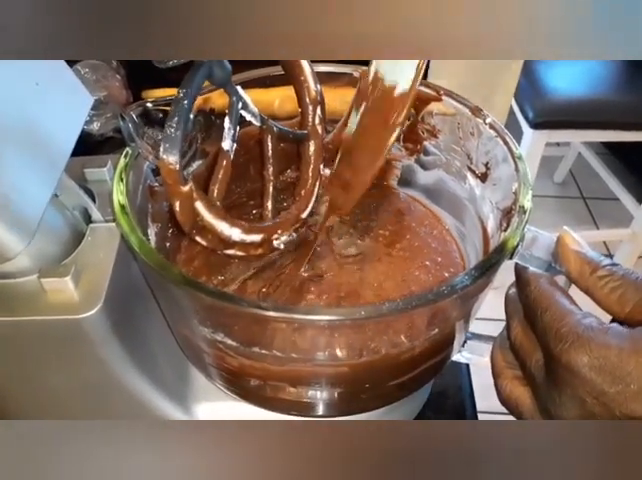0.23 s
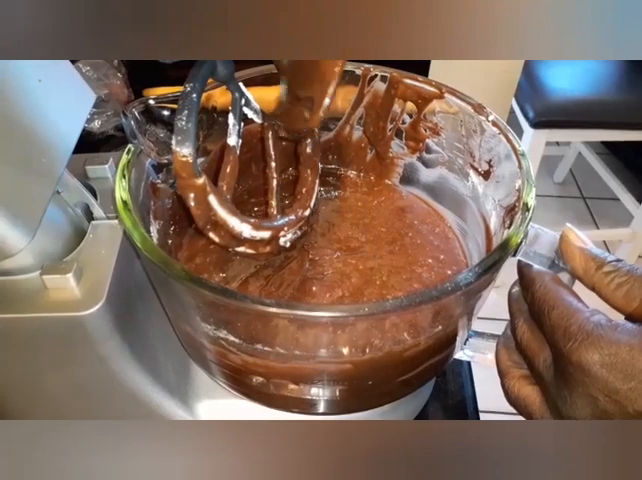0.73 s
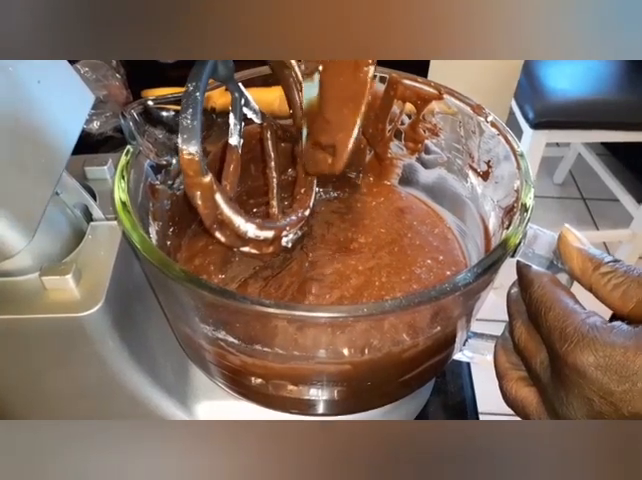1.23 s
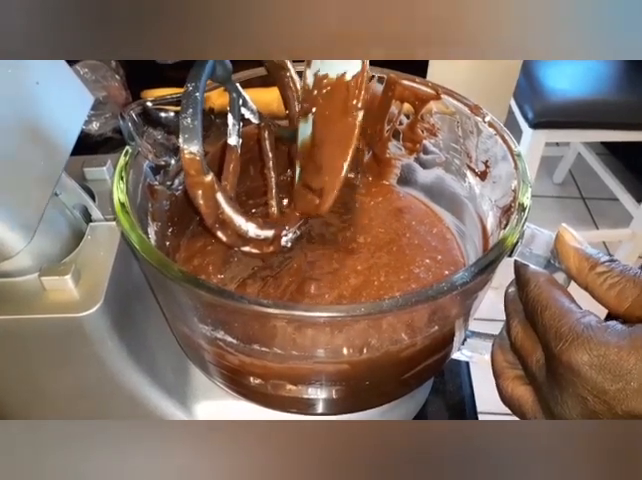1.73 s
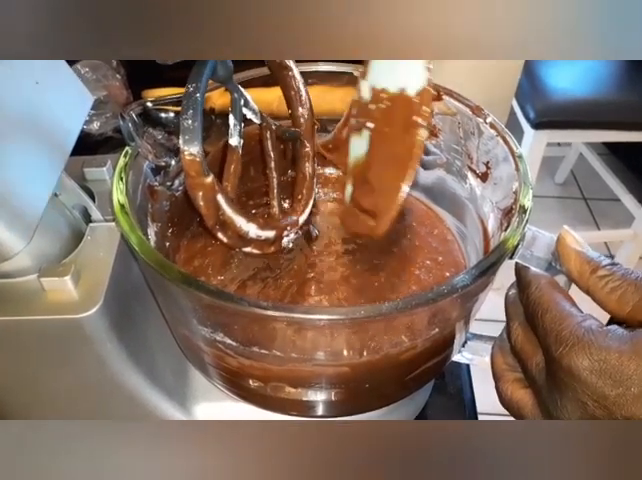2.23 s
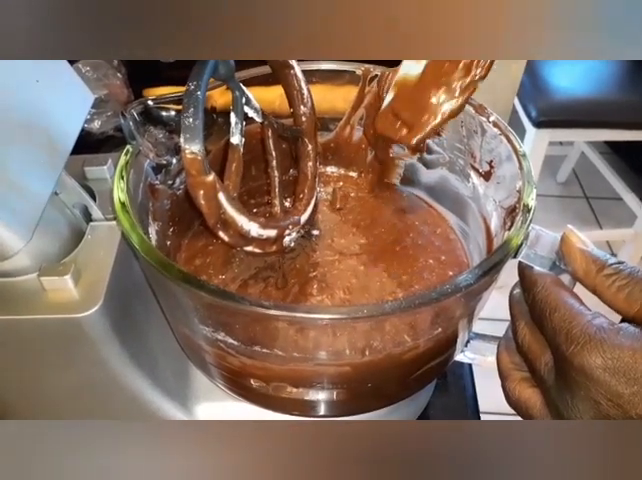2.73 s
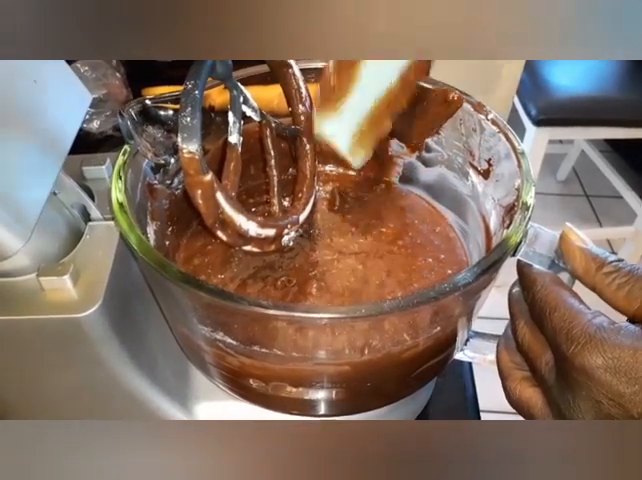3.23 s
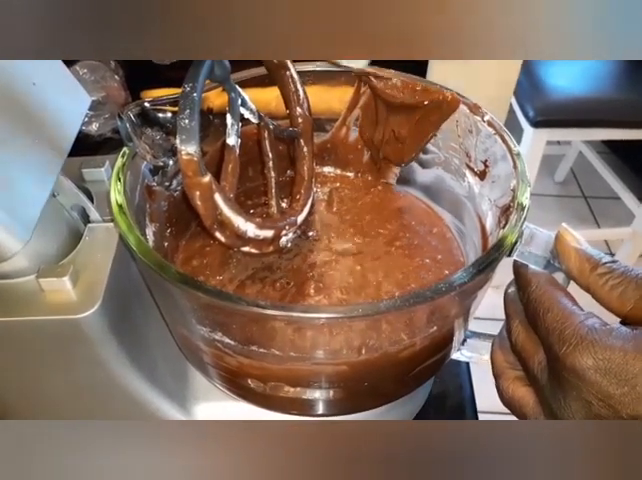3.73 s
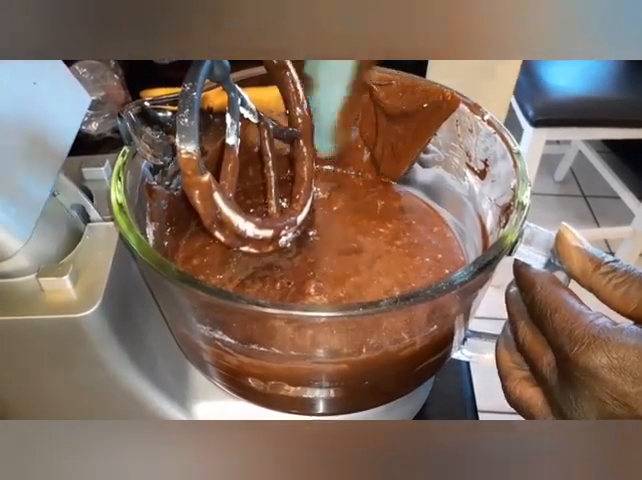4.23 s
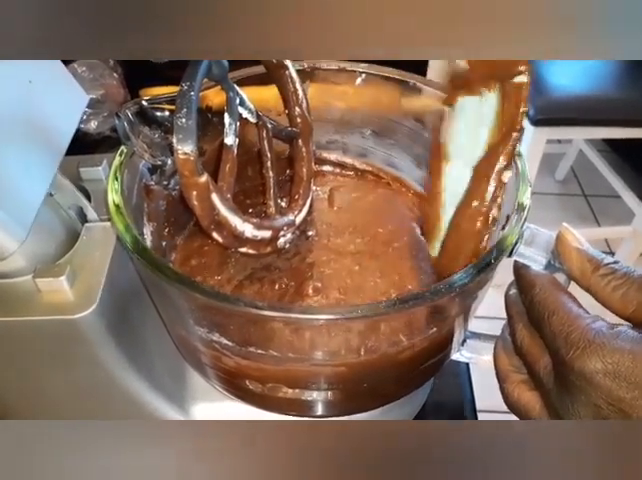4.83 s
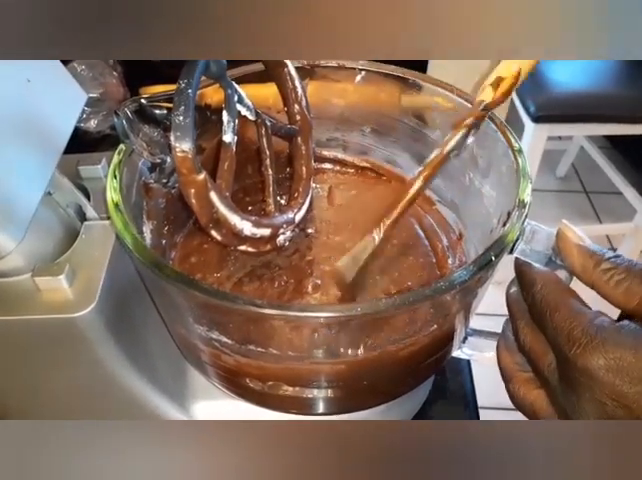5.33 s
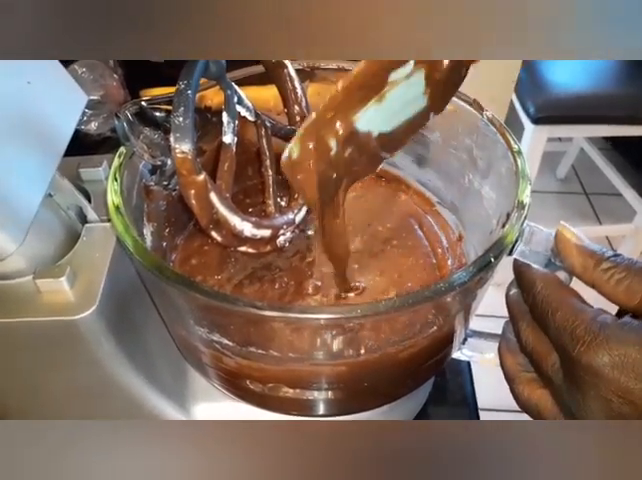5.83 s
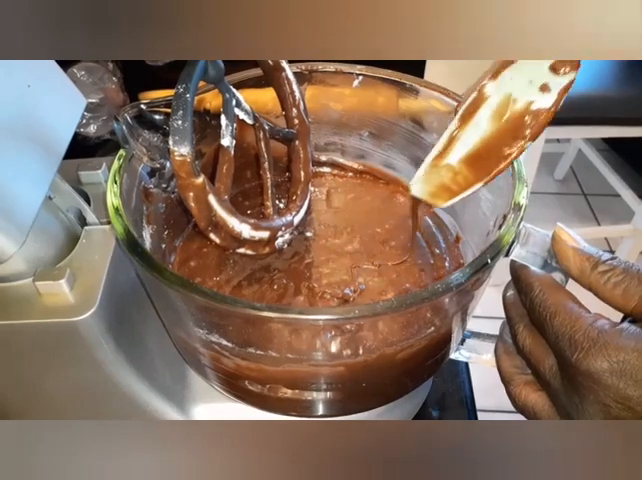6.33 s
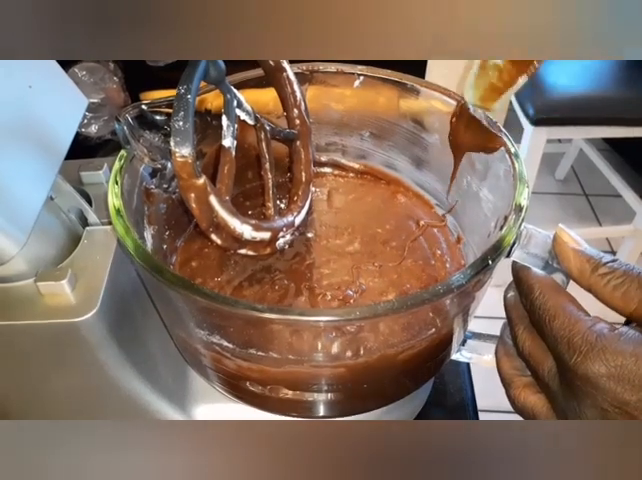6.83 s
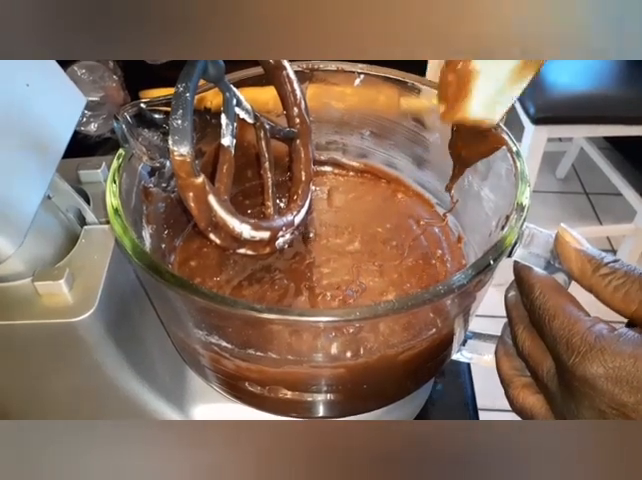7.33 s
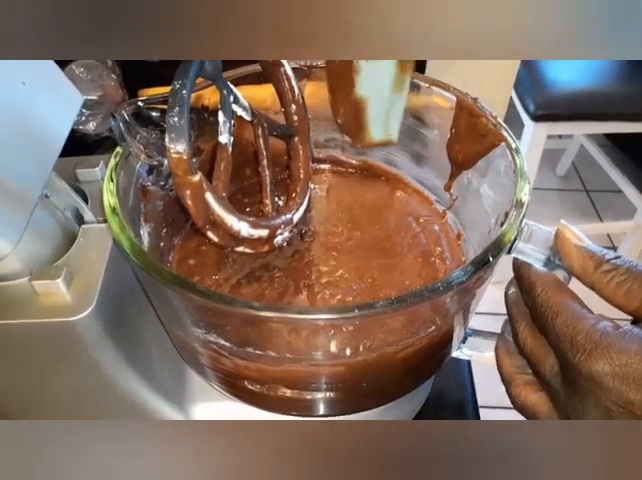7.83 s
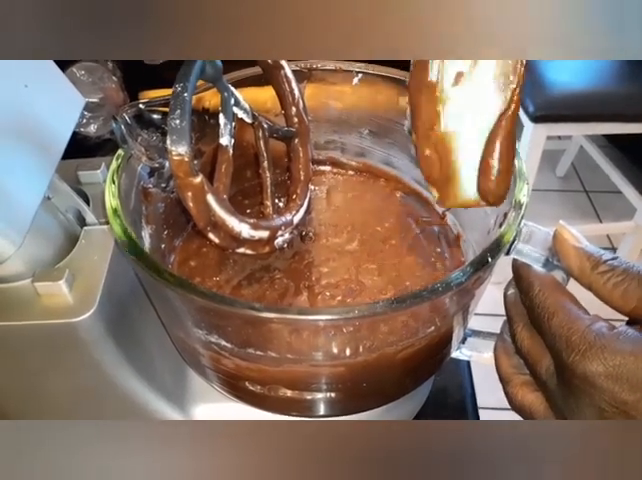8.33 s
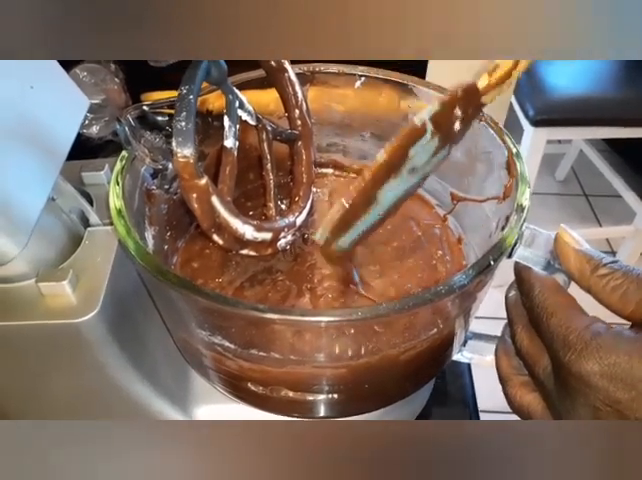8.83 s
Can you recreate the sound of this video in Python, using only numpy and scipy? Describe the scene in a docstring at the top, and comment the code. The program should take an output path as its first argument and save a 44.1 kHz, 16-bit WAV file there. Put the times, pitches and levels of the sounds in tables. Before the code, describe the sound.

Faint motor hum and airy room rumble sit under quiet, sticky batter work. The spatula bumps a coated beater, one bump clearly louder, then glides hissing around the glass wall. Three quick bright knocks ring the bowl and the small room, the background dipping afterwards and recovering. Light wet wiping returns before two duller knocks near the end. Close stereo microphones, leaning left.

```python
"""In a small kitchen, before two microphones: a spatula works thick batter off a beater and round a glass bowl.
Soft bumps ring the beater's modes; smears, a faint squeak and long passes are sticky, crackling noise bands.
Threads of batter snap. Two bouts of raps ring the glass and the room, each rap followed by a clack of the stand.
A motor hums throughout over rumble and air; the recorder's gain ducks after the raps and then comes back."""
import sys
import numpy as np
from scipy import signal
from scipy.fft import rfft, irfft, next_fast_len
from scipy.io import wavfile
from scipy.ndimage import uniform_filter1d, minimum_filter1d

SR = 44100
rng = np.random.default_rng(int(sys.argv[2]) if len(sys.argv) > 2 else 0)


def waveform_to_disk(signal):
    """Save audio, clipped to [-1, 1], as 16-bit WAV at the path in sys.argv[1]."""
    frames = np.transpose(np.atleast_2d(signal))
    scaled = np.clip(frames, -1, 1) * 32767
    samples = np.round(scaled).astype(np.int16)
    wavfile.write(sys.argv[1], SR, samples)


N = 400856
CUTOFF_HZ = 15900  # top of the recorder's band


def from_db(db):
    """Decibels to amplitude gain."""
    return 10 ** (np.asarray(db) / 20)


def at_hz(points, hz):
    """Read a spectrum by straight lines on a log-frequency axis."""
    f, value = np.transpose(points)
    return np.interp(np.log(np.maximum(hz, 1)), np.log(f), value)


# How much louder the left microphone hears each pitch: f/Hz, left minus right level/dB
LEFT_LEAN = [(60, 4.5), (130, 4.8), (220, 1.5), (380, 1.5), (700, 3), (1300, 4.8), (2400, 3.5), (4400, 1),
             (8000, 3.5), (14000, 9.5)]


def lean(hz):
    """Left and right gains: the left microphone hears everything louder."""
    return from_db(np.array([[.5], [-.5]]) * at_hz(LEFT_LEAN, hz))


def drift(per_s, n):
    """Random wander about 0 with a spread near 1: straight lines between normal draws."""
    steps = np.arange(n) / SR * per_s
    knots = int(steps[-1]) + 2
    return np.interp(steps, np.arange(knots), rng.standard_normal(knots))


# Likeness of the sound at the two microphones: f/Hz, correlation (1 is identical)
MIC_LIKENESS = [(60, .97), (130, .98), (290, .92), (640, .3), (1400, -.05), (3000, 0), (16000, 0)]


def noise(spectrum, n, colour=((1, 0),), grains=1, ripple_db=0):
    """Stereo noise of rms 1 before tint and lean; grains chop it, the bowl's hollow ripples its treble."""
    size = next_fast_len(n)
    hz = np.arange(size // 2 + 1) * SR / size
    mid, side = rfft(rng.standard_normal((2, n)) * grains, size)
    alike = np.clip(at_hz(MIC_LIKENESS, hz), -1, 1)
    hollow_hz = np.arange(2500, CUTOFF_HZ, 130)
    ripple = ripple_db * np.interp(hz, hollow_hz, rng.standard_normal(len(hollow_hz)), left=0)
    gain = from_db(at_hz(spectrum, hz) + ripple)
    gain = gain / np.sqrt(np.mean(gain ** 2))
    gain = gain * from_db(at_hz(colour, hz))
    common = np.sqrt((1 + alike) / 2) * mid
    opposed = np.sqrt((1 - alike) / 2) * side * np.array([[1], [-1]])
    return irfft((common + opposed) * gain * lean(hz), size)[:, :n]


def dying(t, t60):
    """Exponential decay that falls by 60 dB in t60 seconds."""
    return np.exp(-np.log(1000) * t / t60)


def add(out, s, sound):
    """Mix a sound in at time s, in seconds."""
    start = int(s * SR)
    out[:, start:start + sound.shape[1]] += sound[:, :N - start]


# Motor hum lines in the background: f/Hz, rms level/dB before the lean
MOTOR_HUM = [(120, -55.5), (150.7, -65), (240.3, -54.5), (269.2, -64), (360, -72.5), (387.6, -69.5),
             (434, -63.5), (480, -74.5), (597.5, -70.5)]
# Low rumble of fan and room: f/Hz, relative density/dB per Hz
FAN_RUMBLE = [(20, -47), (35, -43.5), (55, 3.5), (80, -6), (115, 0.5), (160, -15), (195, -10.5),
              (270, -1.5), (340, -9.5), (440, -5), (600, -10.5), (850, -20), (1400, -37)]
# Thin rush of air: f/Hz, relative density/dB per Hz
AIR_RUSH = [(500, -11), (900, -5), (1350, 2), (1800, -2.5), (2350, -1), (2900, -15), (5000, -16),
            (9000, -25), (13000, -17), (16000, -25.5)]


def motor():
    """Hum lines wavering slightly in phase and level, over a low rumble and a thin rush of air."""
    t = np.arange(N) / SR
    hum = 0
    for hz, level_db in MOTOR_HUM:
        phase = 2 * np.pi * hz * t + 0.57 * drift(7, N)
        amplitude = np.sqrt(2) * from_db(level_db + 0.91 * drift(6, N))
        hum = hum + amplitude * lean(hz) * np.sin(phase)
    rumble = from_db(-54.0) * noise(FAN_RUMBLE, N)
    air = from_db(-64.5) * noise(AIR_RUSH, N)
    return hum + rumble + air


def stickiness(n, per_s, spread_db, share, slip_db):
    """Batter parts from glass in tiny bursts over a smooth hiss, while the blade sticks and slips; rms 1."""
    happens = rng.random(n) < per_s / SR
    bursts = happens * from_db(spread_db * np.minimum(rng.exponential(1, n), 4)) ** 2
    power = np.maximum(uniform_filter1d(bursts, size=14), 0)
    share = np.clip(share, 0, 1)  # of the power that comes in bursts
    crackle = np.sqrt(1 - share + share * power / (power.mean() + 1e-12))
    grain = crackle * from_db(slip_db * drift(70.3, n))
    return grain / np.sqrt(np.mean(grain ** 2))


def wipe(length, centre_hz, octaves, swell):
    """A sticky band of noise that swells quickly and trails off."""
    hz = np.geomspace(100, 16000, 160)
    t = np.arange(int(2 * length * SR)) / SR
    # the band is 3 dB down this many octaves either side of its centre
    hump_db = -10 * np.log10(1 + np.abs(np.log2(hz / centre_hz) / octaves) ** 4)
    pressure = (1 - np.exp(-t / swell)) * np.exp(-(t / (0.9 * length)) ** 2)
    grains = stickiness(len(t), per_s=800, spread_db=2.5, share=.36, slip_db=2)
    return pressure * noise(np.c_[hz, hump_db], len(t), grains=grains, ripple_db=3.5)


SMEAR_SWELL_S, SWELL_POWER = 0.027, 0.48  # swell at a 1 kHz centre; thin bright films let go sooner
SMEAR_OCTAVES, WIDTH_POWER = .46, .22  # half-width at a 1 kHz centre; bright smears are broader
SQUEAK_S, SQUEAK_LENGTH_S, SQUEAK_HZ = 2.57, .3, 2100
SQUEAK_DB, SQUEAK_OCTAVES = -61.5, 0.12
# Short smears of the blade: t/s, length/s, level/dB, centre f/Hz
BLADE_SMEARS = [(0.06, 0.42, -70, 9000), (0.441, 0.18, -57.5, 2400), (0.669, 0.041, -49, 13000),
                (0.748, .11, -57, 11900), (.77, .13, -57.5, 1830), (1.11, 0.11, -75, 4500),
                (1.9, 0.21, -51.5, 760), (2.01, 0.61, -65.5, 11900), (2.237, 0.13, -52, 7500),
                (2.443, .1, -48, 8200), (2.549, 0.34, -67, 4500), (2.98, 0.19, -56, 880),
                (3.349, 0.09, -55, 9600), (3.37, 0.1, -41.5, 446), (3.455, .24, -60, 10000),
                (5.867, 0.11, -51, 8630), (6.12, 0.14, -58, 7000), (7.212, .11, -60, 8700),
                (7.901, 0.21, -62.5, 1850)]


def smears():
    """Short wipes of the blade, the brighter the quicker and broader, and one narrow, faint squeak."""
    out = np.zeros((2, N))
    for s, length, level_db, centre_hz in BLADE_SMEARS:
        khz = centre_hz / 1000
        octaves = SMEAR_OCTAVES * khz ** WIDTH_POWER
        swell = SMEAR_SWELL_S / khz ** SWELL_POWER
        add(out, s, from_db(level_db) * wipe(length, centre_hz, octaves, swell))
    squeak = wipe(SQUEAK_LENGTH_S, SQUEAK_HZ, SQUEAK_OCTAVES, SMEAR_SWELL_S)
    add(out, SQUEAK_S, from_db(SQUEAK_DB) * squeak)
    return out


THREADS_PER_S, THREADS_UNTIL_S = 2, 3.7  # faint ones, while the beater is being cleaned
THREAD_DB, THREAD_SPREAD_DB = -61, 2.5  # their mean level, and how far they stray either way
# Snap of a batter thread: f/Hz, relative density/dB per Hz
THREAD_SNAP = [(500, 0), (1500, -9), (4000, -10.5), (9500, -16), (13000, 2), (16000, -11)]
# The loudest snaps: t/s, level/dB
CLEAR_SNAPS = [(.094, -59), (0.674, -46), (1.238, -59), (1.407, -56), (1.511, -56), (1.694, -46),
               (1.998, -44), (2.64, -57), (3.548, -51), (4.448, -53), (4.815, -51), (7.258, -44)]


def threads():
    """Threads of batter snap, each a noise tick with a weak tail: clear ones, and faint ones at random."""
    out, t = np.zeros((2, N)), np.arange(SR // 8) / SR
    faint = []
    for when, size in rng.random((int(THREADS_PER_S * THREADS_UNTIL_S), 2)):
        faint.append((when * THREADS_UNTIL_S, THREAD_DB + THREAD_SPREAD_DB * (2 * size - 1)))
    envelope = dying(t, .022) + from_db(-14) * dying(t, .22)
    for s, level_db in CLEAR_SNAPS + faint:
        add(out, s, from_db(level_db) * noise(THREAD_SNAP, len(t)) * envelope)
    return out


def wash(spectrum, db, t60, rise):
    """A crowd of modes or echoes too dense to tell apart; t60 and rise in seconds."""
    return spectrum, db, t60, rise


# How far a ringing tone leads at the left microphone: f/Hz, phase/rad
LEFT_LEAD = [(350, 0), (560, .6), (1100, 1.3), (1300, 2.1), (1700, 1.5)]


def blows(events, modes, washes, ring_db, linger_db, linger_t60):
    """Each blow rings modes and washes; hard contact is brighter, and the room holds each tone a little longer."""
    out, t = np.zeros((2, N)), np.arange(SR * 2 // 3) / SR
    linger = from_db(linger_db) * dying(t, linger_t60)
    hz, mode_db, t60 = np.transpose(modes)
    swell = 1 - np.exp(-t * hz[:, None])  # the heavy low modes take a cycle to get going
    decay = dying(t, t60[:, None]) + linger
    tones = np.exp(2j * np.pi * hz[:, None] * t) * swell * decay
    lead = at_hz(LEFT_LEAD, hz) * np.array([[.5], [-.5]])
    for s, level_db, thud_db, hard_db in events:
        colour = [(200, thud_db), (800, 0), (1700, 0), (2700, hard_db)]
        phase = rng.uniform(-1, 1, len(hz)) + lead
        # every blow excites each mode a little differently
        gain = from_db(ring_db + mode_db + at_hz(colour, hz) + rng.standard_normal(len(hz)))
        sound = np.imag((gain * lean(hz) * np.exp(1j * phase)) @ tones)
        for spectrum, wash_db, wash_t60, rise in washes:
            crowd = noise(spectrum, len(t), colour, ripple_db=2.5)
            envelope = dying(t, wash_t60) * (1 - np.exp(-t / rise))
            sound = sound + from_db(wash_db) * crowd * envelope
        add(out, s, from_db(level_db) * sound)
    return out


CUSHIONED_THUD_DB = 8  # a bump at least this dull is too cushioned to set the beater swinging
REBOUND_S, REBOUND_LOSS_DB = .11, 6  # the beater swings back, more faintly
REBOUND_MAX_DB = -27  # its small play caps the level
# Soft bumps on the beater: t/s, level/dB, thud (bass tint)/dB, hardness (treble tint)/dB
BEATER_BUMPS = [(.693, -14.5, 2, 5.5), (1.405, -8, 7.5, 5), (1.697, -15.5, 13.5, 2.5), (2.002, 0, 4, -8),
                (2.025, -12.5, 6.5, 8.5), (2.495, -30, 19.5, 23.5), (3.392, -24, 23.5, 17.5),
                (3.45, -36, 18, 14)]
# Modes of the batter-coated beater: f/Hz, relative level/dB, t60/s
BEATER_MODES = [(121, -44.5, 0.39), (149, -36, 0.25), (255, -30, 0.076), (510, -35, 0.1), (694, -41, 0.11),
                (1006, -31.5, 0.14), (1074, -29, 0.096), (1153, -26, 0.062), (1700, -37, 0.071),
                (1856, -52, 0.3)]
# The beater's crowd of short modes: f/Hz, relative density/dB per Hz
BEATER_CROWD = [(40, -40), (120, 7), (280, -7), (750, -6), (1100, 2.5), (1400, -11), (1800, -10),
                (3000, -23.5), (8000, -32), (16000, -47)]
# The kitchen's answer to a bump: f/Hz, relative density/dB per Hz
BEATER_ECHO = [(80, -23), (700, 3), (1100, -4), (1500, -1), (3000, -12.5), (8000, -30), (16000, -46)]


def bumps():
    """Batter cushions the blade where it meets the beater, which swings back with a fainter touch."""
    rebounds = []
    for s, level_db, thud_db, _ in BEATER_BUMPS:
        if thud_db < CUSHIONED_THUD_DB:
            rebound_db = min(level_db - REBOUND_LOSS_DB, REBOUND_MAX_DB)
            rebounds.append((s + REBOUND_S, rebound_db, 0, 2))
    washes = [wash(BEATER_CROWD, db=-29.5, t60=0.11, rise=0.0012),
              wash(BEATER_ECHO, db=-50.0, t60=0.84, rise=.012)]
    return blows(BEATER_BUMPS + rebounds, BEATER_MODES, washes,
                 ring_db=.5, linger_db=-31, linger_t60=0.73)


def push(length):
    """The hand presses harder, then eases off: 0 to 1 and back."""
    t = np.arange(int(length * SR)) / SR
    peak = .4 * length
    return np.sin(np.interp(t, [0, peak, length], [0, np.pi / 2, np.pi]))


HISS_DB, RUB_DB = 2, -28.5  # gains applied to the pressure
RUB_FOLLOWS = 0.61  # the rub grows by this share of the hiss's dB
# Long glides of the blade along the wall: t/s, length/s, pressure level/dB
WALL_PASSES = [(3.394, 3.1, -69.5), (7.25, 1.8, -69.5)]
# Pushes of the hand during those passes: t/s, length/s, pressure level/dB
HAND_PUSHES = [(3.975, 0.28, -63.5), (4.184, 0.27, -60), (4.42, .14, -53), (4.564, 0.12, -51.5),
               (4.703, 0.21, -57), (4.882, .16, -59.5), (7.483, .16, -62.5), (7.626, 0.079, -67),
               (7.87, 0.14, -63), (8.04, 0.082, -62), (8.142, 0.14, -67), (8.797, 0.15, -55)]
# Wet hiss of batter on glass: f/Hz, relative density/dB per Hz
BATTER_HISS = [(2000, -22), (3200, -5.5), (5600, -0.5), (7200, -5), (8500, 0), (10300, -6), (11600, 0.5),
               (13600, -0.5), (15800, -6)]
# Duller rub of the blade: f/Hz, relative density/dB per Hz
BLADE_RUB = [(600, -11.5), (1400, 3.5), (2300, 5.5), (3000, -1.5), (5000, -8.5), (8000, -20)]


def strokes():
    """The blade is pushed around the wall: a wet crackling hiss over a duller rub that follows pressure less."""
    effort, out = np.zeros((1, N)), np.zeros((2, N))
    for s, length, level_db in WALL_PASSES + HAND_PUSHES:
        add(effort, s, (from_db(level_db) * push(length)[None]) ** 2)  # overlapping pushes add as power
    touching = effort[0] > 0
    pressure = np.sqrt(effort[0, touching])
    n = len(pressure)
    grains = stickiness(n, per_s=600, spread_db=3.5, share=.36, slip_db=1.5)
    hiss = from_db(HISS_DB) * pressure * noise(BATTER_HISS, n, grains=grains)
    rub = from_db(RUB_DB) * pressure ** RUB_FOLLOWS * noise(BLADE_RUB, n, grains=grains)
    out[:, touching] = hiss + rub
    return out


# Raps on the bowl: t/s, level/dB, thud (bass tint)/dB, hardness (treble tint)/dB
BOWL_RAPS = [(5.3854, -0.5, 4.5, -18), (5.556, 4.5, 1, -5), (5.7311, 3.5, 0, -4), (8.861, 0, 9, -11.5),
             (9.0138, 0.5, 5, -10.5)]
# Modes of the bowl on its stand: f/Hz, relative level/dB, t60/s
BOWL_MODES = [(72.4, -35.5, .2), (113, -27, 0.22), (144.2, -25, 0.28), (250, -40, .2), (322.2, -25.5, 0.15),
              (346, -32.5, 0.2), (485, -38, .1), (567, -19, 0.11), (683, -21, 0.14), (810, -38, 0.16),
              (964, -38, 0.27), (1210, -24, 0.27), (1265, -14, .17), (1336, -13.5, .19), (1354, -33, .6),
              (2281, -26, .3), (1366, -25.5, 0.068), (1614, -26, 0.041), (1672, -16.5, 0.047),
              (1740, -31, 0.046), (2135, -35, 0.22), (2120, -27, 0.21), (2690, -27, 0.19),
              (2734, -31.5, 0.11), (3070, -29.5, .16), (3290, -36, .2), (3456, -31, .2), (3700, -34.5, .25),
              (3800, -28.5, .18), (6300, -30.5, 0.083)]
# Crack of the contact: f/Hz, relative density/dB per Hz
CONTACT_CRACK = [(500, -27), (1500, -4), (3500, 3.5), (6300, 0.5), (9000, -10), (16000, -24)]
# The bowl's crowd of short modes: f/Hz, relative density/dB per Hz
BOWL_CROWD = [(30, -38), (60, -10), (115, 0), (200, -22), (330, -1), (950, -7), (1350, 1), (1700, 0.5),
              (2000, -14.5), (3500, -2), (4300, -11.5), (6300, -10.5), (7300, -17), (16000, -26)]
# The kitchen's answer to a rap: f/Hz, relative density/dB per Hz
BOWL_ECHO = [(60, -9), (200, -10.5), (400, -6), (1000, -8.5), (1350, 3.5), (1650, -7), (2000, -6.5),
             (2280, 1.5), (2700, -7.5), (3700, -3), (4200, -9.5), (6000, -13), (10000, -28.5), (16000, -45)]


def raps():
    """The spatula strikes the glass with a crack and a ring; the kitchen rings on."""
    washes = [wash(CONTACT_CRACK, db=-10.5, t60=0.026, rise=0.00016),
              wash(BOWL_CROWD, db=-12.5, t60=0.1, rise=0.0014),
              wash(BOWL_ECHO, db=-25.5, t60=0.52, rise=0.012)]
    return blows(BOWL_RAPS, BOWL_MODES, washes, ring_db=-0.5, linger_db=-30.0, linger_t60=0.83)


ROCK_AFTER_S = .0558  # from the rap to the clack
ROCK_DB, ROCK_THUD_DB, ROCK_HARD_DB = -.5, 6.5, 0.5
# Clack of the bowl's foot on the stand: f/Hz, relative density/dB per Hz
STAND_CLACK = [(60, -6.5), (130, -2), (200, -14.5), (450, -4), (650, 6.5), (950, 2), (1400, -3), (2250, 3),
               (2900, -12.5), (6000, -16.5), (10000, -27.5), (16000, -30.5)]


def rocks():
    """After each rap the bowl drops back on its stand with a dry clack."""
    drops = [(s + ROCK_AFTER_S, ROCK_DB, ROCK_THUD_DB, ROCK_HARD_DB) for s, *_ in BOWL_RAPS]
    washes = [wash(STAND_CLACK, db=-19.5, t60=0.062, rise=0.00088),
              wash(STAND_CLACK, db=-36.5, t60=0.404, rise=0.016)]
    return blows(drops, BOWL_MODES, washes, ring_db=-18.0, linger_db=-21, linger_t60=0.54)


def scene():
    """Everything in the kitchen as it reaches the two microphones."""
    return motor() + smears() + threads() + bumps() + strokes() + raps() + rocks()


def gain_control(x, threshold_db, slope, hold_s, release_db_per_s):
    """Loud sounds pull the gain down within milliseconds; it stays down for a while, then recovers."""
    power = signal.lfilter([.003], [1, -.997], np.mean(x ** 2, axis=0))
    level = 10 * np.log10(power + 1e-12)
    cut_db = -slope * np.maximum(level - threshold_db, 0)
    half = int(hold_s * SR / 2)
    # the origin makes the window look back only, so the deepest cut is held
    held_db = minimum_filter1d(cut_db, 2 * half + 1, mode="constant", origin=half)
    recovery = release_db_per_s * np.arange(N) / SR
    gain_db = np.minimum.accumulate(held_db - recovery) + recovery
    return x * from_db(gain_db)


def record(dry):
    """The recorder controls the gain, rounds the peaks and cuts the top."""
    controlled = gain_control(dry, threshold_db=-20, slope=0.3, hold_s=1.22, release_db_per_s=13.5)
    rounded = np.tanh(controlled)
    top_cut = signal.ellip(10, .2, 70, CUTOFF_HZ, fs=SR, output="sos")
    return signal.sosfilt(top_cut, rounded)


dry = scene()
out = record(dry)
waveform_to_disk(out)
```